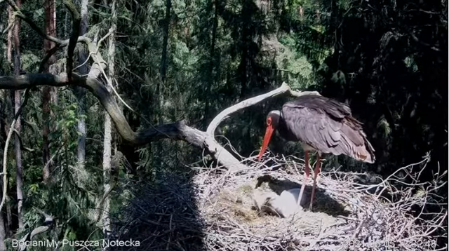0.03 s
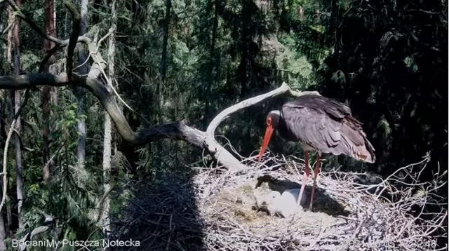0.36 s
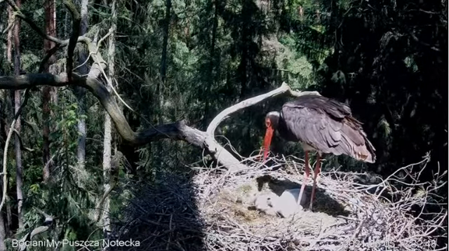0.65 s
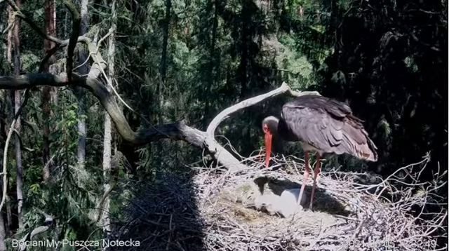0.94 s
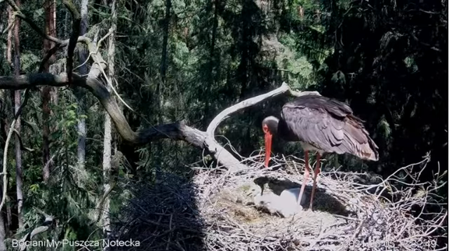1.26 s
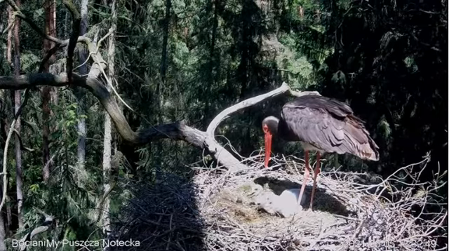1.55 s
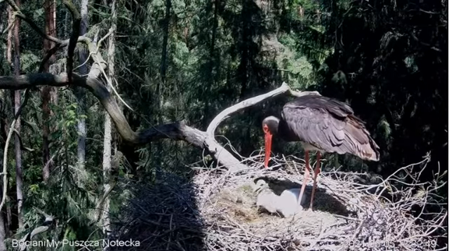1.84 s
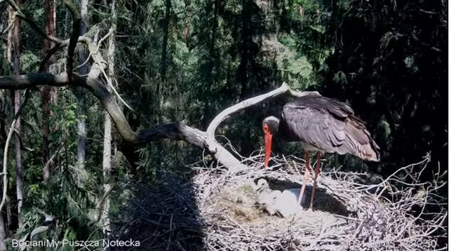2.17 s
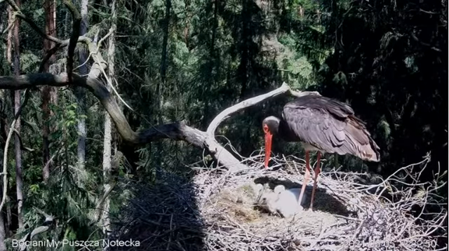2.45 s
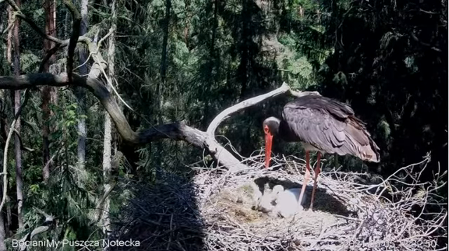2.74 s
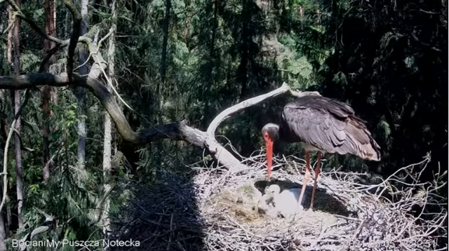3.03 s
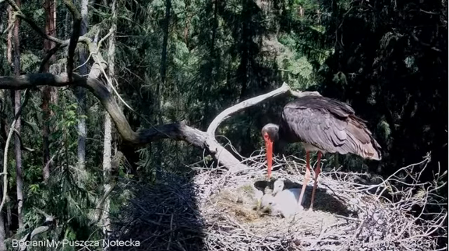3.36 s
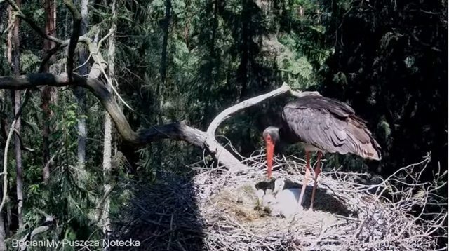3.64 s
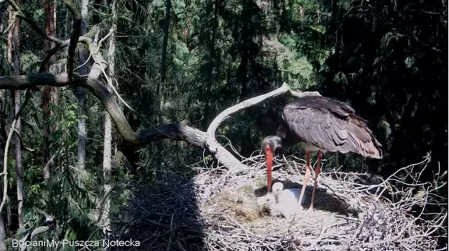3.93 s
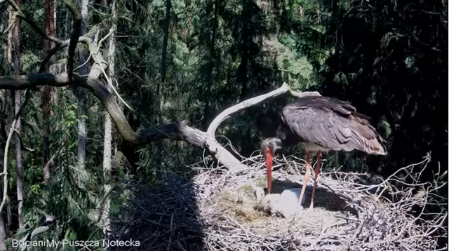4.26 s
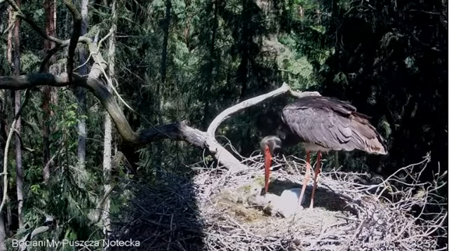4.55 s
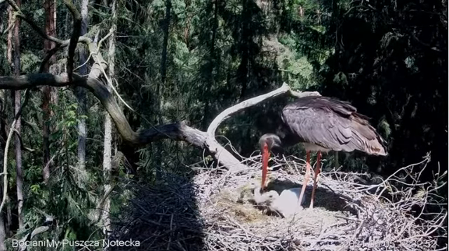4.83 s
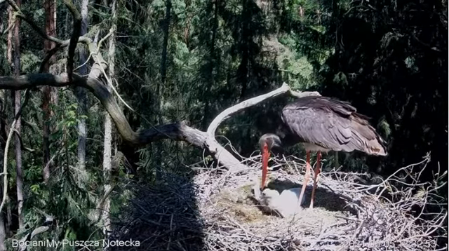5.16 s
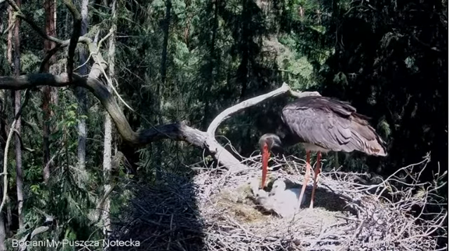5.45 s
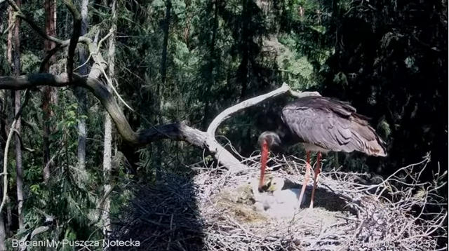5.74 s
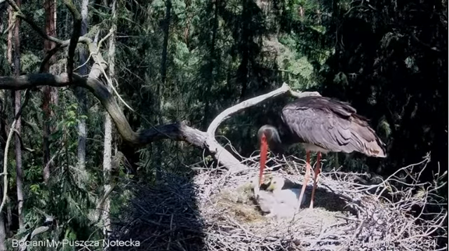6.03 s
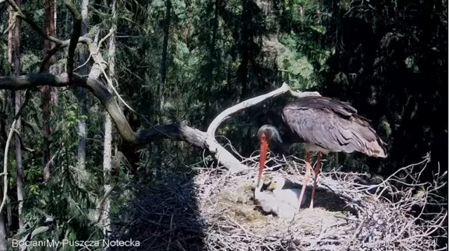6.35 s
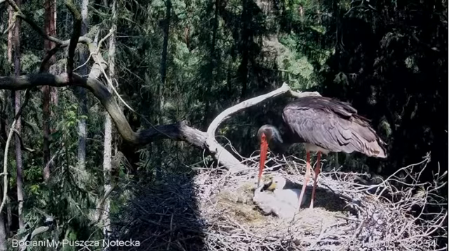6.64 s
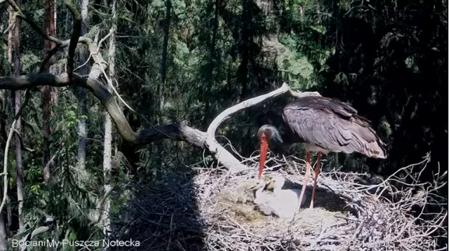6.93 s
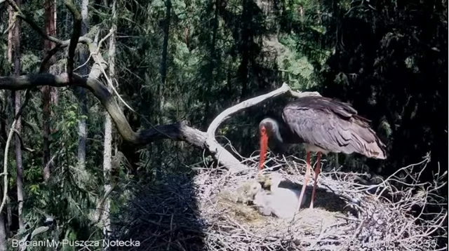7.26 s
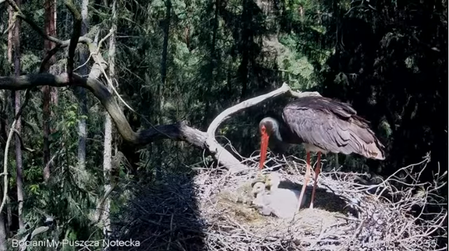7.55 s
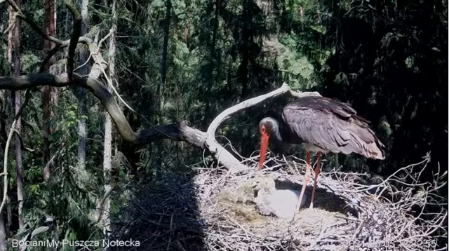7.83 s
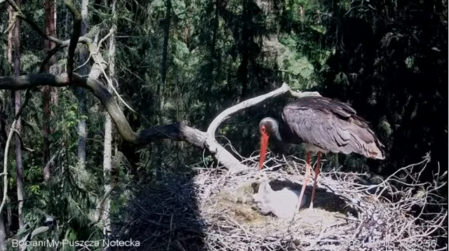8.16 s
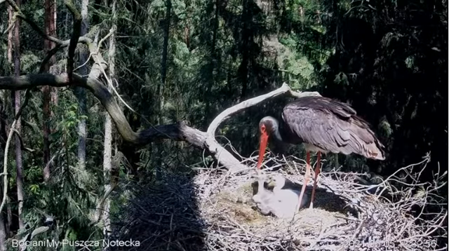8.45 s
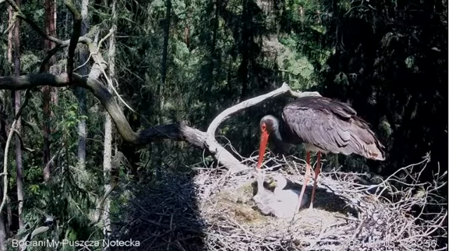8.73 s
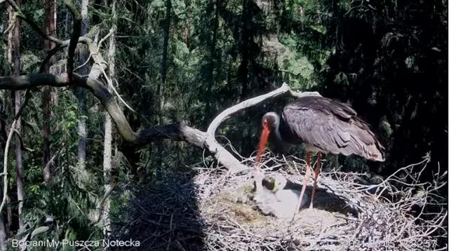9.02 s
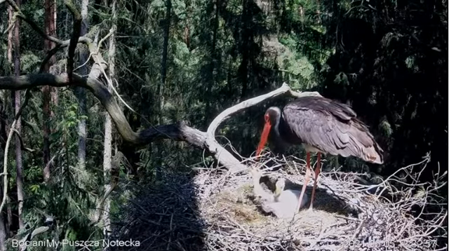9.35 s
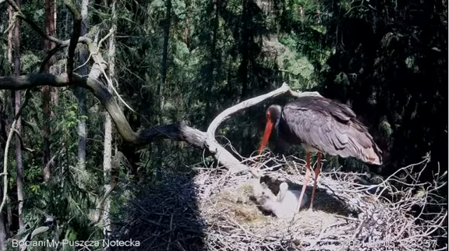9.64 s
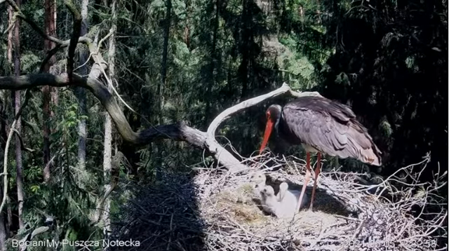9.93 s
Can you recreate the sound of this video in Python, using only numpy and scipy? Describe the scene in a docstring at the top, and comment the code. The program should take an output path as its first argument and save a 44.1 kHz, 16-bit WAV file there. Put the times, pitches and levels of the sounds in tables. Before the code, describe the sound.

Stork chicks beg from a nearby forest nest with very short creaking rasps that often slide in or out through a thin whistle. Two loud bursts fill the first two seconds. After a pause of about a second, the calls return more softly, flare up around five seconds, then grow weaker and sparser, ending just before nine. Beneath them, leaves hiss quietly throughout and a faint low drone comes and goes. Distant songbirds add thin sliding notes and blurred trills, mostly in the first six seconds. A light breeze rumbles on the microphone, with one small gust at the start and a series of soft gusts from about five to nine seconds. A dry twig snaps softly near 6.4 seconds, and two more at about 9.4 and 9.8, alongside faint birdsong. The nest sounds close and fairly dry, with a slight echo from the trees.

```python
"""Black stork chicks beg on their forest nest, over hissing leaves, a faint drone and far songbirds.
They open with loud bursts of creaking rasps, pulses of the syrinx that ring throat and bill, often
sliding in or out through a thin whistle. After a pause at two seconds they go on more softly and flare
up near five. Then gusts rumble on the microphone while the begging fades, ending just before nine.
Songbirds and two twig snaps close the scene; throughout, the trees return a faint tail."""
import sys
import numpy as np
from scipy import signal
from scipy.fft import rfft, irfft
from scipy.io import wavfile
from scipy.ndimage import map_coordinates

SR = 44100
rng = np.random.default_rng(int(sys.argv[2]) if len(sys.argv) > 2 else 0)


def dump(signal):
    """Clip the signal to [-1, 1] and save it as 16-bit WAV at the path in sys.argv[1]."""
    limited = np.clip(np.atleast_2d(signal).T, -1, 1)
    pcm = np.round(limited * 32767).astype(np.int16)
    wavfile.write(sys.argv[1], SR, pcm)


N = 440559
TIME = np.arange(N) / SR


def gain_of(db):
    """Decibels to amplitude."""
    return 10 ** (np.asarray(db) / 20)


def unit_rms(x):
    """Scales a signal to an rms of 1."""
    return x / np.sqrt(np.mean(x ** 2) + 1e-20)


def curve_at(points, hz):
    """Reads a curve on a log-frequency axis."""
    point_hz, value = np.transpose(points)
    return np.interp(np.log(hz + 1), np.log(point_hz + 1), value)


def add(mix, start, sound):
    """Lays a sound into the mix at a start time in seconds."""
    part = mix[max(round(start * SR), 0):][:len(sound)]
    part += sound[:len(part)]


def band(x, low_hz, high_hz, order=2):
    """A band-pass between two edges."""
    edges = np.clip([low_hz, max(high_hz, low_hz + 20)], 10, SR / 2 - 20)
    return signal.sosfilt(signal.butter(order, edges, "band", fs=SR, output="sos"), x)


def resonate(x, hz, width_hz):
    """A steep resonance of gain 1 that follows the curve hz."""
    carrier = np.exp(2j * np.pi * np.cumsum(hz * np.ones(len(x))) / SR)
    pole = np.exp(-np.pi * width_hz / SR)
    return 2 * (carrier * signal.lfilter([(1 - pole) ** 2], [1, -2 * pole, pole * pole], x / carrier)).real


def wander(size, hz):
    """Smooth random modulation of about unit spread, changing some hz times a second."""
    at = np.arange(size) * hz / SR
    return map_coordinates(rng.standard_normal(int(at[-1]) + 4), [at + 1], order=2, mode="nearest")


def noise(spectrum):
    """Steady noise of a given colour, at an rms of 1."""
    colour = gain_of(curve_at(spectrum, np.fft.rfftfreq(N, 1 / SR)))
    return unit_rms(irfft(rfft(rng.standard_normal(N)) * colour, N))


def glide(length, pitches, waver, flutter_db, quaver=0):
    """Progress 0-1, phase and fluttering gain of an unsteady note that bends through three pitches."""
    size = max(round(length * SR), 100)
    u = np.linspace(0, 1, size)
    hz = np.polyval(np.polyfit([0, .5, 1], pitches, 2), u)
    hz *= 1 + waver * wander(size, 700) + quaver * wander(size, 169)
    return u, 2 * np.pi * np.cumsum(hz) / SR, gain_of(flutter_db * wander(size, 420))


def leaves(low_trim_db=-4.0, sheen_db=-61.0):
    """Leaves hiss in two slowly drifting bands, with a narrow steady sheen on top."""
    # The colour of the hiss. Each row: frequency in Hz, relative level in dB.
    spectrum = [(76, -16.5), (130, -4), (160, -5.5), (224, -7), (347, -6.5), (379, -9), (414, -5.5),
                (1190, -9), (1680, -15.5), (1810, -15.5), (2230, -16.5), (2850, -17), (3640, -12),
                (5550, -25.5), (8600, -40), (11200, -56.5), (18900, -120)]
    # Its two faders. Each row: time in seconds, low band in dB before its trim, high band in dB.
    faders = [(0, -50.5, -53), (1, -52.5, -53.5), (1.7, -49.5, -54), (2.4, -53, -55), (3, -52.5, -56),
              (3.6, -51, -52.5), (4.3, -54, -55), (5, -51, -47.5), (5.6, -53.5, -54.5), (6.3, -53.5, -54.5),
              (7, -54.5, -58), (9.99, -57, -56)]
    times, low_db, high_db = np.transpose(faders)
    hiss = noise(spectrum)
    low = signal.sosfiltfilt(signal.butter(2, 1800, fs=SR, output="sos"), hiss)
    high = hiss - low
    low = low / band(low, 440, 1500).std() * gain_of(low_trim_db + np.interp(TIME, times, low_db))
    high = high / band(high, 1400, 6600).std() * gain_of(np.interp(TIME, times, high_db))
    sheen = unit_rms(band(rng.standard_normal(N), 3400, 3750)) * gain_of(sheen_db)
    return low + high + sheen


def drone():
    """A faint low drone comes and goes."""
    # The drone's fader. Each row: time in seconds, level in dB.
    fader = [(0, -56), (.4, -60.5), (1.1, -67), (1.9, -60), (2.8, -62), (3.3, -72.5), (7, -80), (8.2, -63),
             (9.99, -65.5)]
    hum = unit_rms(band(rng.standard_normal(N), 145.8, 178.0))
    return hum * gain_of(np.interp(TIME, *np.transpose(fader)))


def wind(trim_db=2.0, lumpy_db=1.5, rise_db_per_s=187, fall_db_per_s=136):
    """A lumpy breeze on the microphone; each gust swells quickly and dies a little more slowly."""
    # The colour of the rumble. Each row: frequency in Hz, relative level in dB.
    rumble = [(8.8, -35), (15, -12.5), (37, 5), (57, -1.5), (91, -1.5), (231, -27.5), (300, -26),
              (390, -40.5), (660, -120)]
    # The breeze. Each row: time in seconds, level in dB before the trim.
    breeze = [(0, -60.5), (1.05, -63), (1.6, -53.5), (2.6, -54.5), (3, -62), (3.7, -57.5), (4.8, -66.5),
              (5.9, -56), (9, -55), (9.99, -59.5)]
    # Gusts over it. Each row: time of the peak in seconds, level in dB before the trim.
    gusts = [(.39, -48.5), (5.2, -48.5), (5.67, -45.5), (6.09, -42.5), (6.31, -52), (6.85, -45),
             (7.03, -46), (8.12, -45.5), (8.26, -41), (8.79, -45), (8.91, -43), (9, -52), (9.12, -44.5)]
    blow_db = np.interp(TIME, *np.transpose(breeze))
    for peak_s, peak_db in gusts:
        drop_db = np.maximum(rise_db_per_s * (peak_s - TIME), fall_db_per_s * (TIME - peak_s))
        blow_db = np.maximum(blow_db, peak_db - drop_db)
    return noise(rumble) * gain_of(trim_db + blow_db + lumpy_db * wander(N, 14))


def trees(x, build_s=0.0053, echoes_per_s=2500):
    """Scattered echoes from the trunks build up, then die at their own speed in each band."""
    # The forest's decay. Each row: frequency in Hz, seconds to fall by 60 dB.
    decay_times = [(200, 0.34), (1000, 1), (3000, 0.71), (8000, 0.45)]
    taps = rng.standard_normal(SR) * (rng.random(SR) < echoes_per_s / SR)
    hz, t, bands = signal.stft(taps, SR, nperseg=256)
    bands = bands * gain_of(-60 * t / curve_at(decay_times, hz)[:, None])
    tail = signal.istft(bands * (1 - np.exp(-t / build_s)), SR)[1]
    return signal.fftconvolve(x, tail / np.linalg.norm(tail))[:N]


def far_trills(trim_db=-4.0, trill_db=2.6):
    """Birdsong so far off that only a smeared, pulsing band of pitch arrives."""
    # Phrases blurred by the wood. Each row: start and end in seconds, first and last pitch in Hz,
    # bandwidth in Hz, level in dB before the trim.
    phrases = [(0.067, 0.428, 4360, 4330, 880, -45), (0.502, 0.945, 3030, 2970, 900, -43),
               (0.858, 1.153, 2040, 2100, 219, -48), (1.036, 1.3, 5200, 5160, 700, -54),
               (2.38, 2.75, 5500, 5300, 700, -62.5), (2.055, 2.347, 4000, 3700, 600, -58),
               (1.168, 1.594, 3320, 3240, 700, -41), (2.498, 2.953, 2500, 2700, 300, -57.5),
               (4.056, 4.3, 4900, 4750, 690, -51.5), (4.321, 4.75, 4850, 4500, 600, -50.5),
               (4.701, 5.546, 4900, 4460, 600, -55.5), (4.221, 4.44, 2960, 2800, 600, -50.5),
               (5.103, 6.146, 3260, 3860, 450, -48.5), (5.894, 6.15, 2940, 2750, 1110, -48),
               (8.248, 8.413, 4200, 4200, 450, -52), (9.274, 9.798, 3200, 2600, 600, -61),
               (9.346, 9.978, 5400, 4700, 900, -65)]
    out = np.zeros(N)
    for start, end, first, last, width, db in phrases:
        size = round((end - start) * SR)
        u = np.linspace(0, 1, size)
        hz = first + (last - first) * u + .25 * width * wander(size, 45)
        blur = resonate(rng.standard_normal(size), hz, width)
        swell = np.interp(u, [0, .13, .6, 1], [0.86, 1, 0.86, 0.4])
        trill = gain_of(trill_db * wander(size, 34.9))
        add(out, start, gain_of(db + trim_db) * unit_rms(blur * swell * trill))
    return out


def songbirds():
    """Thin sliding notes from deep in the wood, single or repeated in runs."""
    # The runs. Each row: start in seconds, number of notes, spacing and note length in seconds,
    # opening note's first and last pitch in Hz, pitch factor from note to note, relative level in dB.
    runs = [(.085, 1, 0, 0.06, 4200, 5100, 1, -50), (.775, 1, 0, .155, 5130, 2103, 1, -40),
            (2.111, 1, 0, 0.12, 1663, 1515, 1, -52.5), (2.361, 1, 0, 0.22, 2170, 2380, 1, -57),
            (2.718, 1, 0, .018, 4550, 5800, 1, -57), (2.838, 4, 0.097, .01, 4350, 4840, 1.12, -60),
            (2.793, 8, .056, 0.014, 3590, 3900, 1.02, -46.5),
            (3.443, 4, .165, .052, 4250, 2700, .97, -40.5), (3.575, 3, .159, 0.036, 3700, 4600, 1, -47),
            (4.146, 6, .023, .02, 3950, 4840, .935, -41), (4.395, 1, 0, 0.056, 2800, 4300, 1, -49.5),
            (5.44, 3, .176, 0.071, 3870, 3990, 1, -50), (5.585, 2, .343, .055, 5320, 5600, 1, -60.5),
            (9.296, 3, .177, 0.062, 3400, 2550, .975, -57.5), (9.817, 1, 0, 0.15, 1600, 1635, 1, -65)]
    out = np.zeros(N)
    for start, count, period, length, first, last, step, db in runs:
        pitches = np.array([first, first + .72 * (last - first), last])  # most of the slide comes early
        for k in range(round(count)):
            u, phase, flutter = glide(length, pitches * step ** k, waver=.015, flutter_db=4.5)
            note = np.sin(np.pi * u) * flutter * np.sin(phase)
            add(out, start + k * period, gain_of(db) * unit_rms(note))
    return out


def nest_reflections(x, level_db=-9.0, decay_s=0.0082, echoes_per_s=1500):
    """The nest and its branch add quick reflections to the direct sound."""
    t = np.arange(SR // 25) / SR
    taps = rng.standard_normal(len(t)) * (rng.random(len(t)) < echoes_per_s / SR)
    taps *= np.exp(-t / decay_s) * (t > .001)
    return x + gain_of(level_db) * signal.oaconvolve(x, taps / np.linalg.norm(taps))[:N]


def twig_snaps(decay_s=0.0018):
    """Dry twigs snap softly under the birds' feet."""
    # The snaps. Each row: start in seconds, peak level in dB.
    snaps = [(6.4416, -35), (9.438, -36.5), (9.816, -38.5)]
    out, t = np.zeros(N), np.arange(SR // 50) / SR
    for start, db in snaps:
        tick = band(rng.standard_normal(len(t)) * np.exp(-t / decay_s), 1800, 4000)
        add(out, start, gain_of(db) * tick / abs(tick).max())
    return out


def bout_treble(time_s):
    """Edge and fizz, the two top resonances, in dB for the bout of begging under way."""
    # The bouts. Each row: start in seconds, edge and fizz in dB relative to the bill.
    bouts = [(0, -23.5, -25), (1.1, -21, -25), (1.45, -21, -41), (3, -10, -21), (3.5, -8.5, -23),
             (4.5, -23, -30), (4.65, -15, -19), (5.2, -15, -36), (5.6, -27, -23), (7.1, -12, -27),
             (7.7, -20, -27)]
    return bouts[sum(start <= time_s for start, _, _ in bouts[1:])][1:]


def bend(hz, ratios, scatter=.07, top_hz=3650):
    """First, middle and last pitch of a whistle beside a rasp, scattered so that no two bend alike."""
    return np.minimum(hz * np.array(ratios) * (1 + scatter * rng.uniform(-1, 1, len(ratios))), top_hz)


def whistle(start, length, pitches, db, crest, rattle_hz=376.6, usual_edge_db=-15):
    """Under less strain the syrinx swings freely: a sliding tone that rattles more when loud."""
    # Low whistles ring the bill with their octave. Each row: pitch in Hz, relative octave level in dB.
    octave = [(1500, 20), (2000, -10), (2500, -19), (3400, -26)]
    # Shrill ones also sound half their pitch. Each row: pitch in Hz, level in dB per unit of rattle.
    undertone = [(2700, -29), (3300, -8.5)]
    harshness_db = bout_treble(start)[0] - usual_edge_db  # a harsh bout strengthens the overtones
    octave_db = curve_at(octave, pitches[1]) + harshness_db
    rattle = np.interp(db, [-42, -30], [.12, .44])
    waver = np.interp(db, [-42, -30], [.015, .028])
    u, phase, flutter = glide(length, pitches, waver, flutter_db=3.5, quaver=.03)
    beat_hz = rattle_hz * (1 + .25 * wander(len(u), 200))
    beat = 2 * np.pi * (np.cumsum(beat_hz) / SR + rng.random())
    swell = abs(np.sin(np.pi * np.interp(u, [0, crest, 1], [0, .5, 1]))) ** .49
    roughness = 1 + .5 * wander(len(u), 1300)
    envelope = unit_rms(swell * flutter * roughness * (1 + rattle * np.cos(beat)))
    phase = phase + rattle * np.sin(beat)  # each rattle also tugs the pitch
    overtones = gain_of(octave_db) * (np.sin(2 * phase) + gain_of(-20) * np.sin(3 * phase))
    sub_octave = rattle * gain_of(curve_at(undertone, pitches[1])) * np.sin(phase / 2)
    return start, gain_of(db) * envelope * np.sqrt(2) * (np.sin(phase) + overtones + sub_octave)


def rasp(length, pulse_hz, bill_hz, throat_db, bill_db, edge_db, fizz_db, shut_hz=2315, open_hz=3670):
    """The syrinx snaps shut in uneven pulses; each rings the wobbling resonances of throat and bill."""
    # A chick's resonances: two of the throat, two of the bill, then edge and fizz.
    # Each row: resting frequency in Hz, bandwidth in Hz.
    tract = [(440, 294), (900, 456), (2400, 835), (3560, 315), (5050, 690), (7300, 1500)]
    size = max(round(length * SR), 100)
    u = np.linspace(0, 1, size)
    push = np.sin(np.pi * u)
    slowing = np.exp(-6.0 * length * (u - .5))  # the syllable runs out of air
    jitter = np.exp(.06 * wander(size, 300))
    rate = pulse_hz * slowing * (1 + .12 * (push - .5)) * jitter
    cycles = np.cumsum(rate) / SR
    snaps = np.diff(np.floor(cycles), prepend=-1) * gain_of(2.5 * rng.uniform(-1, 1, size))
    # Air escapes after each snap, the more the harder the chick pushes.
    puffs = .009 * rate / 300 * np.exp(-2 * (cycles % 1)) * rng.standard_normal(size)
    drive = np.pad(-(snaps + puffs) * (1 + push), (0, SR // 100))
    # A wider gape raises the lower bill resonance and hands power to the upper one.
    gape = np.clip((bill_hz - shut_hz) / (open_hz - shut_hz), .05, .9)
    lower_db, upper_db = bill_db + 10 * np.log10([1 - gape, gape])
    levels_db = (throat_db - 4, throat_db, lower_db, upper_db, edge_db, fizz_db)
    lifts = (1, 1, 1 + .22 * (gape - .3), 1, 1, 1)
    voice = 0
    for (hz, width), db, lift in zip(tract, levels_db, lifts):
        ring = resonate(drive, hz * lift * (1 + .04 * wander(len(drive), 157)), width)
        flutter = gain_of(5.0 * wander(len(drive), 117.3))
        voice = voice + gain_of(db) * unit_rms(ring * flutter)
    return band(voice, 280, 7300, order=3) * np.sqrt(len(drive) / size)


def chicks(mid_pitch_hz=2880, mid_pulse_hz=286, dive_s=.009, dive_overlap_s=.01, climb_overlap_s=.005):
    """Each syllable is a rasp; a whistle may dive into it or climb out. Squeals come in between."""
    # The begging. Each row: start and length in seconds, pulses a second, pitch in Hz, then the levels
    # in dB of throat, bill, lead-in whistle and lead-out whistle (None for no whistle).
    syllables = [ (0.032, 0.033, 191, 2900, -48.5, -38.5, None, -33.5),
                 (0.19, 0.029, 480, 3380, -47.5, -34, -34.5, -31.5),
                 (0.302, 0.033, 548, 3380, -49, -31.5, -29.5, -30),
                 (0.424, 0.049, 480, 3076, -48.5, -35, -31.5, -31.5),
                 (0.552, 0.013, 300, 3160, -55, -45, None, -41),
                 (0.602, 0.013, 145, 2960, -53.5, -49, -42.5, None),
                 (1.141, 0.071, 150, 2550, -50.5, -41.5, None, None),
                 (1.295, 0.017, 310, 3300, -51, -42.5, None, None),
                 (1.37, 0.04, 420, 2800, -47.5, -42, None, -36.5),
                 (1.475, .044, 198, 2660, -50.5, -44.5, -39.5, -33),
                 (1.575, 0.051, 160, 3070, -45.5, -43.5, None, None),
                 (1.648, 0.029, 415, 3350, -64, -35.5, -42, -33.5),
                 (1.689, 0.047, 132, 3150, -48.5, -48.5, None, None),
                 (1.754, 0.033, 465, 3426, -48, -32, -38, -33.5),
                 (1.866, .045, 436, 3320, -48.5, -33, -28.5, -33),
                 (1.982, 0.054, 374, 2850, -56, -36.5, -34, -33.5),
                 (2.146, 0.011, 180, 2850, -57, -42.5, None, None),
                 (3.041, .024, 66, 2250, -57, -59, None, None),
                 (3.2, 0.036, 480, 3220, -53, -41.5, None, -38.5),
                 (3.291, .018, 162, 2550, -49, -48, None, -37.5),
                 (3.323, 0.045, 400, 2700, -62, -44.5, None, None),
                 (3.37, .03, 350, 3180, -50, -49.5, None, -43),
                 (3.458, 0.029, 260, 2600, -45, -48.5, None, None),
                 (3.551, 0.046, 350, 3180, -47, -47, None, -43),
                 (3.646, 0.05, 304, 2740, -48, -48.5, None, -44.5),
                 (3.754, 0.04, 260, 2750, -49, -46, None, -50.5),
                 (3.857, 0.027, 182, 2460, -49, -46.5, None, None),
                 (4.098, 0.058, 78, 2880, -53.5, -55, None, None),
                 (4.524, 0.024, 206, 2830, -55, -47, None, None),
                 (4.59, 0.023, 253, 2430, -51, -42, None, -41.5),
                 (4.679, 0.033, 494, 3020, -46, -39, -39.5, -38),
                 (4.77, 0.046, 470, 3290, -47.5, -38, None, -34.5),
                 (4.877, 0.063, 340, 2703, -50, -39, -34.5, -37.5),
                 (4.952, 0.036, 383, 2920, -47, -45, None, None),
                 (5.015, .08, 247, 2624, -45.5, -40, -32.5, None),
                 (5.152, 0.036, 357, 2700, -47.5, -45.5, None, -45),
                 (5.228, 0.024, 110, 3300, -57, -49, None, None),
                 (5.252, 0.057, 203, 2630, -45.5, -48, None, None),
                 (5.354, 0.034, 160, 3350, -52, -51.5, None, None),
                 (5.809, 0.026, 240, 2540, -55.5, -47.5, None, -44),
                 (5.945, 0.046, 115, 3300, -57.5, -59, None, None),
                 (6.014, 0.05, 320, 3200, -55.5, -48.5, None, None),
                 (6.145, .029, 160, 3000, -52.5, -52, -47, None),
                 (6.229, 0.04, 233, 2920, -50, -46, None, -47.5),
                 (6.346, 0.031, 395, 2900, -50.5, -50, None, -47.5),
                 (6.437, .037, 250, 2940, -51, -52.5, None, -45),
                 (6.535, 0.051, 363, 2610, -52.5, -49, None, -49),
                 (6.648, 0.044, 154, 3100, -50.5, -54.5, None, None),
                 (6.737, 0.022, 123, 3400, -56, -57.5, None, None),
                 (7.2, 0.05, 127, 2000, -56, -53.5, None, None),
                 (7.357, 0.023, 330, 3110, -55.5, -51, None, -50),
                 (7.447, .042, 330, 2720, -52, -49, None, -51),
                 (7.544, 0.051, 300, 2680, -53.5, -49.5, None, -46.5),
                 (7.655, .045, 170, 2500, -51.5, -49.5, None, None),
                 (7.761, .034, 170, 2360, -52.5, -44, None, None),
                 (8.27, 0.032, 185, 2570, -58, -47.5, None, None),
                 (8.347, 0.024, 380, 2800, -58.5, -49.5, None, -44.5),
                 (8.432, 0.03, 370, 2755, -53, -50, -47, -48),
                 (8.523, 0.045, 253, 2680, -52, -50.5, None, -45),
                 (8.622, 0.049, 233, 2750, -53, -51, None, -45),
                 (8.739, 0.057, 155, 2620, -53, -52.5, None, None),
                 (8.822, 0.028, 97, 2830, -59.5, -60, None, None)]
    # Whistles that never break into a rasp. Each row: start and length in seconds,
    # first, middle and last pitch in Hz, level in dB.
    squeals = [(0.498, 0.055, 3540, 2205, 1390, -41), (.672, 0.055, 2050, 3530, 2980, -44),
               (1.533, 0.02, 2490, 2303, 3280, -31), (1.615, 0.037, 3370, 3320, 3220, -35.5),
               (3.063, .019, 2130, 2200, 2450, -38), (3.13, .02, 2700, 2790, 3320, -45),
               (3.145, 0.029, 3200, 2960, 2840, -44.5), (3.18, 0.028, 3120, 2690, 2580, -41.5),
               (3.349, .022, 2790, 2200, 3250, -42.5), (3.416, 0.034, 2660, 2100, 1810, -42.5),
               (3.483, 0.023, 2100, 2004, 1820, -41.5), (4.542, 0.024, 2820, 2280, 2530, -36),
               (4.575, 0.022, 2150, 2235, 1900, -38), (5.071, 0.019, 2760, 2306, 2340, -34.5),
               (5.11, .027, 3040, 2260, 1990, -43), (5.138, 0.016, 2520, 2250, 1650, -36),
               (5.652, 0.024, 1740, 2140, 2550, -44), (5.689, .041, 2320, 2700, 1930, -44),
               (5.756, 0.029, 2040, 2560, 3800, -43.5), (5.845, 0.071, 2655, 1854, 2420, -46),
               (5.983, 0.025, 2730, 2040, 1610, -47), (6.09, 0.051, 2080, 2100, 2320, -43.5),
               (6.205, 0.048, 2280, 1710, 1850, -52), (6.555, 0.041, 1807, 1714, 2050, -49.5),
               (6.598, .038, 2770, 3010, 1860, -48), (7.285, 0.029, 2370, 2790, 2980, -50),
               (7.716, 0.019, 2060, 2470, 2830, -48)]
    out = np.zeros(N)
    for start, length, pulse_hz, hz, throat_db, bill_db, in_db, out_db in syllables:
        shrill = hz / mid_pitch_hz
        bill_hz = 2645 * shrill ** .67  # the bill resonance rises with pitch
        edge_db, fizz_db = bout_treble(start)
        # Shriller syllables and faster pulses have a harder edge.
        edge_db += 12 * np.log2(shrill) + 2.5 * np.log2(pulse_hz / mid_pulse_hz)
        creak = rasp(length, pulse_hz, bill_hz, throat_db, bill_db, bill_db + edge_db, bill_db + fizz_db)
        add(out, start, creak)
        if in_db is not None:
            dive = bend(hz, (1.2, .96, .927))
            add(out, *whistle(start - dive_s, dive_s + dive_overlap_s, dive, in_db, crest=.6))
        if out_db is not None:
            climb = bend(hz, (.84, .96, 1.18))
            climb_s = .019 * 2 ** ((out_db + 31) / 16)  # 16 dB softer is half as long
            climb_start = start + length - climb_overlap_s
            add(out, *whistle(climb_start, climb_overlap_s + climb_s, climb, out_db, crest=.58))
    for start, length, *pitches, db in squeals:
        add(out, *whistle(start, length, pitches, db, crest=.42))
    return out


def scene():
    """The nest is near and dry; its shrill notes carry into the trees, where the songbirds sit."""
    nest = nest_reflections(chicks() + twig_snaps())
    song = songbirds()
    echo = trees(gain_of(-17.0) * nest + gain_of(-27.0) * band(nest, 2200, 4900) + gain_of(-8.5) * song)
    return (nest + gain_of(-3.5) * song + far_trills() + echo + leaves() + drone() + wind())[None]


def record(dry):
    """A steep low-pass takes off the treble above 8520 Hz."""
    low_pass = signal.firwin(255, 8520, window=("kaiser", 8), fs=SR)
    return signal.oaconvolve(dry, low_pass[None], "same")


dry = scene()
out = record(dry)
dump(out)
```